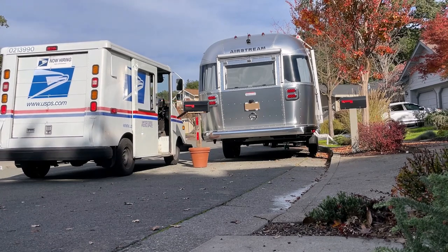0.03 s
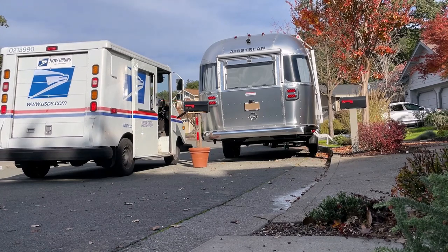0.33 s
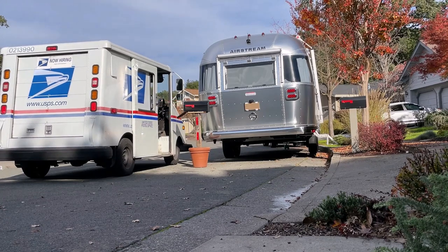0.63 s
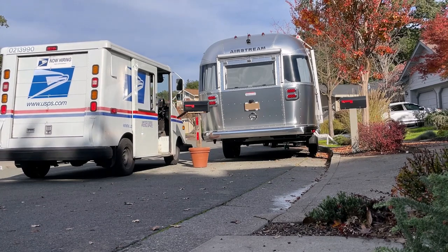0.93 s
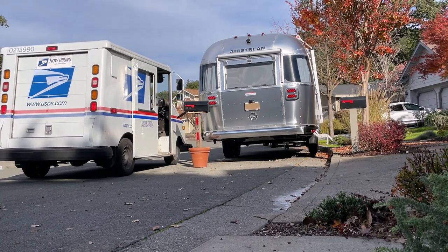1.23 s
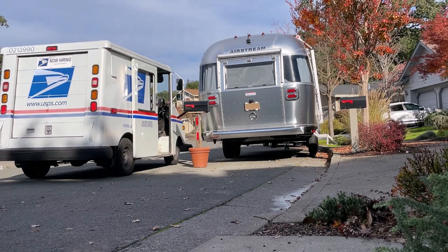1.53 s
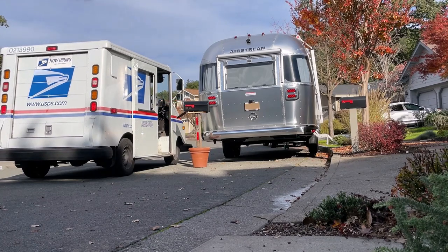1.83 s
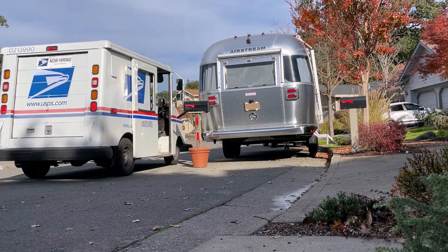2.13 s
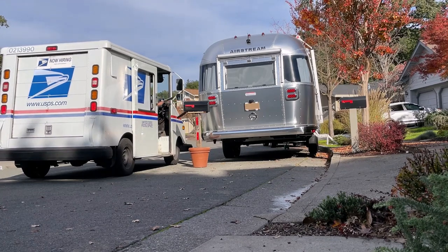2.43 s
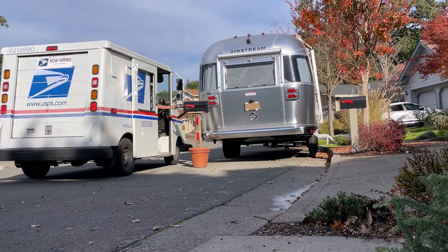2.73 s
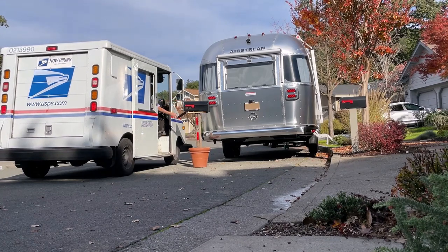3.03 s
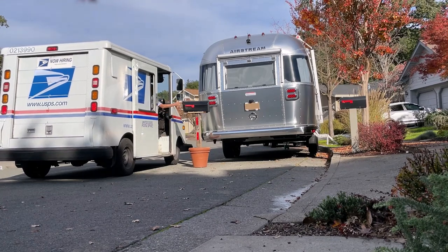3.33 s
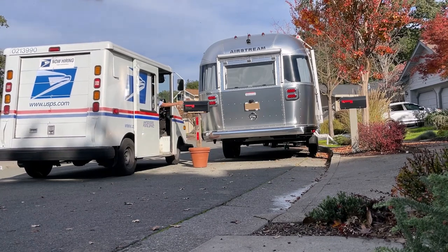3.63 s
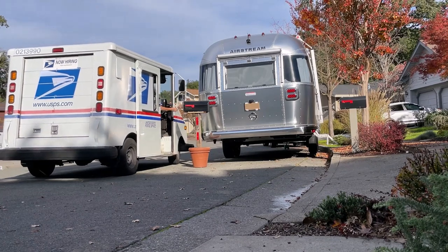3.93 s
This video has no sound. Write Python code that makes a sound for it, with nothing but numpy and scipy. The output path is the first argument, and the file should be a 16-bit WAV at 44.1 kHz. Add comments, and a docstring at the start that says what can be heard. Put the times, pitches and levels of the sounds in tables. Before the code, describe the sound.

A metal mailbox door clacks twice over an idling truck engine on a street.

```python
"""A mail truck idles some metres away over street hiss: its exhaust throbs and puffs, its valves tick.
Its body thumps at the start; soft clunks and scrapes follow as the driver handles the mail.
At 3 s a sheet-metal mailbox rings: a light knock, the clack of the door, then the brighter catch.
A brief hum and a few dry ticks follow. Vehicles and houses throw the knocks back;
two microphone ports hear it all slightly apart."""
import sys
import numpy as np
from scipy import signal
from scipy.fft import rfft, irfft, next_fast_len
from scipy.io import wavfile
from scipy.ndimage import map_coordinates

SR = 44100
rng = np.random.default_rng(int(sys.argv[2]) if len(sys.argv) > 2 else 0)


def pcm_store(signal):
    """Save signal as 16-bit PCM."""
    levels = np.round(np.clip(np.atleast_2d(signal), -1, 1) * 32767)
    wavfile.write(sys.argv[1], SR, levels.astype(np.int16).T)


N = 4 * SR

# Spectrum of the mail ticks and door-edge hits. Each row: frequency in Hz, relative level in dB.
EDGE_SPECTRUM = [(200, -17), (1800, 1), (3000, -3), (4400, 5), (6800, -0.5), (9200, 0.5), (10800, -6),
                 (13000, -9), (15500, -15)]


def amp(db):
    """Decibels to gain."""
    return 10 ** (np.asarray(db) / 20)


def unit(x):
    """Scale to rms 1."""
    return x / np.sqrt(np.mean(x ** 2) + 1e-20)


def along(points, hz):
    """Interpolate (Hz, value) points on a log axis."""
    knots_hz, values = np.transpose(points)
    return np.interp(np.log(hz + 1), np.log(knots_hz + 1), values)


def curves(rows):
    """One value per sample for each column after the time."""
    times_s, *columns = np.transpose(rows)
    return [np.interp(np.arange(N) / SR, times_s, column) for column in columns]


def since(start_s):
    """Seconds since the start, zero before it."""
    return np.maximum(np.arange(N) / SR - start_s, 0)


def wobble(rate_hz):
    """Smooth random curve with knots at the given rate."""
    return map_coordinates(rng.standard_normal(4096), [np.arange(N) * rate_hz / SR], mode="mirror")


def filtered(x, response):
    """Apply a complex frequency response."""
    size = next_fast_len(N + SR // 4)
    return irfft(rfft(x, size) * response(np.fft.rfftfreq(size, 1 / SR)), size)[..., :N]


def spread(pair):
    """Two unrelated signals become a partly alike left and right."""
    # Each row: frequency in Hz, coherence of the two ports.
    coherence = [(50, 0.98), (250, 0.93), (1000, 0.87), (3000, 0.96), (5200, 0.55), (7000, 1), (12000, 1)]
    angle = lambda hz: np.arccos(np.clip(along(coherence, hz), 0, 1)) / 2
    mid, side = filtered(pair, lambda hz: np.array([np.cos(angle(hz)), np.sin(angle(hz))]))
    return np.array([mid + side, mid - side])


def noise(spectrum, ripple_db=0, spacing_hz=68.9):
    """Coloured stereo noise of rms 1; ripple adds random resonances."""
    peaks = rng.standard_normal(4096)
    ripple = lambda hz: ripple_db * map_coordinates(peaks, [hz / spacing_hz], mode="mirror")
    white = rng.standard_normal((2, N))
    return unit(spread(filtered(white, lambda hz: amp(along(spectrum, hz) + ripple(hz)))))


def blow(start_s, attack_s, t60_s):
    """Envelope of a blow: quick rise, exponential fall."""
    t = since(start_s)
    return (1 - np.exp(-t / attack_s)) * amp(-60 * np.minimum(t / t60_s, 10))


def ring(modes, start_s, db, attack_s, rough_rad_per_khz):
    """Struck metal rings in its modes, the higher ones less steadily."""
    t = since(start_s)
    phase = lambda hz: 2 * np.pi * hz * t + rough_rad_per_khz * hz / 1000 * wobble(90)
    return amp(db) * sum(amp(mode_db) * blow(start_s, attack_s, t60_s) * np.sin(phase(hz))
                         for hz, mode_db, t60_s in modes)


def contacts(hits, spectrum, attack_s, t60_s):
    """Each contact is a short burst of dense, uneven resonances."""
    power = sum((amp(db) * blow(start_s, attack_s, t60_s)) ** 2 for start_s, db in hits)
    return np.sqrt(power) * noise(spectrum, ripple_db=3)


def exhaust(turns, levels_db, pipe_hz=73, pipe_q=1.4, waver_db=2, jitter_rad=0.12):
    """Shaft orders 2-4 throb through the resonant pipe; unsteady overtones sharpen each beat."""
    # Each row: shaft order, level in dB.
    overtones = [(1, -62), (5, -63), (6, -55), (7, -53.5), (8, -54.5), (9, -64.5), (10, -61.5), (12, -52),
                 (13, -60), (14, -61.5)]
    angle = 2 * np.pi * turns
    shaft_hz = np.gradient(turns) * SR
    pipe_lag = lambda hz: 2 * np.arctan(pipe_q * (hz / pipe_hz - pipe_hz / hz))
    throb = sum(amp(db) * np.sin(order * angle - pipe_lag(order * shaft_hz))
                for order, db in enumerate(levels_db, 2))
    for order, db in overtones:
        gain = amp(db + waver_db * wobble(6.97))
        phase = order * (angle + jitter_rad * wobble(12))
        throb += gain * np.sin(phase - pipe_lag(order * shaft_hz))
    return np.sqrt(2) * throb


def firings(turns, scatter_db, limp_db, fade_turns):
    """Envelope of two uneven firings a turn, every second one weaker."""
    firing = np.floor(2 * turns).astype(int)
    strength = amp(scatter_db * rng.standard_normal(N)[firing] - limp_db * (firing % 2))
    age_turns = turns % 0.5
    return unit(strength * np.exp(-age_turns / fade_turns))


def clatter(turns):
    """Engine noise swells with each turn; the valves tick and the tailpipe puffs gas."""
    # Each row: time in seconds, gain in dB.
    drift = [(0, 2), (.12, 1.5), (.35, 0.5), (1.2, 0.5), (1.6, -0.5), (2.1, 0.5), (2.9, 0), (3.3, 2),
             (3.7, 1.5), (4, 2.5)]
    # Spectra. Each row: frequency in Hz, relative level in dB.
    rumble_spectrum = [(20, -23), (42, 1), (70, 8.5), (110, 8), (160, -1), (260, -7), (350, -1),
                       (520, -9.5), (900, -10), (1600, -18.5), (2300, -24.5), (3200, -25.5), (5000, -38),
                       (8000, -36), (16000, -62)]
    puff_spectrum = [(80, -27), (170, 6.5), (350, -1), (600, -4.5), (1200, -13), (3000, -39.5)]
    valve_spectrum = [(200, -38), (800, 8), (1800, 6), (3200, -7), (6000, -22), (15000, -48)]
    drift_db, = curves(drift)
    swell = amp(0.2 * np.cos(2 * np.pi * turns) + 0.63 * wobble(16))
    ticks = firings(turns, scatter_db=2.8, limp_db=1.5, fade_turns=0.59)
    valves = ticks * noise(valve_spectrum, ripple_db=3)
    puffs = firings(turns, scatter_db=1, limp_db=1, fade_turns=0.44) * noise(puff_spectrum)
    rumble = unit(swell) * noise(rumble_spectrum)
    return amp(drift_db) * (amp(-42) * rumble + amp(-57) * valves + amp(-49) * puffs)


def engine(first_turn_s=0.007):
    """The four-cylinder engine hunts gently around its idle speed."""
    # Each row: time in seconds, shaft speed in Hz, levels of orders 2, 3 and 4 in dB.
    idle = [(0, 28.5, -44, -35.5, -38.5), (0.09, 28.55, -36, -38.5, -32), (0.24, 28.23, -36.5, -42, -36),
            (0.48, 28.21, -37, -41, -36), (0.7, 28.39, -38, -42, -33.5), (1.21, 28.22, -35.5, -42, -35),
            (1.44, 28.02, -37, -49, -36), (1.53, 27.36, -38.5, -40, -43.5), (1.64, 27.16, -38.5, -37, -40),
            (1.84, 27.3, -36, -47, -43.5), (1.95, 27.69, -38.5, -38, -35.5), (2.3, 27.95, -35, -40, -35),
            (2.6, 27.8, -38, -37.5, -37.5), (2.91, 27.22, -36.5, -42, -40), (3.15, 28.1, -35, -42.5, -33.5),
            (3.45, 28.18, -38.5, -37.5, -35), (3.74, 28.17, -38, -38.5, -36),
            (3.84, 26.9, -36.5, -42.5, -41), (4, 26.5, -38, -35, -39.5)]
    shaft_hz, *levels_db = curves(idle)
    turns = np.cumsum(shaft_hz) / SR - first_turn_s * shaft_hz[0]
    return exhaust(turns, levels_db) + clatter(turns)


def street():
    """Steady street hiss."""
    # Each row: frequency in Hz, relative level in dB.
    spectrum = [(30, 5), (400, 4.5), (1500, -6), (3000, -11.5), (5000, -16.5), (7000, -25), (9000, -15),
                (11500, -20), (14000, -27), (15800, -49)]
    return amp(-55) * noise(spectrum)


def truck_thump():
    """A dull blow rings the truck's body."""
    # Each row: frequency in Hz, relative level in dB, t60 in seconds.
    modes = [(179.5, 4, 0.23), (235, -3, 0.55)]
    return ring(modes, start_s=0, db=-29, attack_s=0.0034, rough_rad_per_khz=1)


def rattles():
    """Dull contacts of sheet metal."""
    # Each row: start in seconds, level in dB.
    hits = [(0.001, -40), (0.145, -46.5), (2.999, -39.5)]
    # Each row: frequency in Hz, relative level in dB.
    spectrum = [(100, -13), (250, -4.5), (450, 11), (700, 4), (1100, 1), (2000, 1.5), (3000, -0.5),
                (4200, -11.5), (6500, -16), (9000, -16), (15000, -34)]
    return contacts(hits, spectrum, attack_s=0.0025, t60_s=0.13)


def handling():
    """Soft clunks in the cab; handled mail scrapes and ticks."""
    # Each row: start in seconds, level in dB.
    clunks = [(0.16, -38.5), (0.595, -44), (0.785, -53), (0.875, -42.5), (1.675, -59), (2.03, -43)]
    scrapes = [(0.165, -53), (1.728, -46), (1.958, -50), (2.025, -49), (3.652, -45.5), (3.69, -50)]
    ticks = [(3.799, -55), (3.827, -50), (3.838, -50), (3.855, -53)]
    # Each row: frequency in Hz, relative level in dB.
    clunk_spectrum = [(150, -6), (500, 6.5), (800, 0), (1200, -2), (2000, -16.5), (5000, -51)]
    scrape_spectrum = [(300, -15), (1000, -6), (1500, 3), (2000, -2), (3000, -15), (6000, -33),
                       (15000, -40)]
    return (contacts(clunks, clunk_spectrum, attack_s=0.0045, t60_s=0.16)
            + contacts(scrapes, scrape_spectrum, attack_s=0.005, t60_s=0.21)
            + contacts(ticks, EDGE_SPECTRUM, attack_s=0.00042, t60_s=0.057))


def mailbox_door():
    """The flap knocks, its edge strikes the rim; the slam rings the shell and the door chatters."""
    # Each row: frequency in Hz, relative level in dB, t60 in seconds.
    flap_modes = [(275, -4.5, 0.39), (331, -1, 0.14), (648, -2.5, 0.17), (803, -2, 0.13), (876, -4.5, 0.61),
                  (965, -6.5, 0.12), (1710, -10, 0.083)]
    shell_modes = [(556, 0, .32), (1859, -18, .3), (1300, -18, .22), (784, -15, .32), (226, -14, .4),
                   (503, -12, .2), (1066, -21, .22), (1561, -24, .33), (1610, -18, .22), (2140, -24, .25),
                   (2412, -17, .14), (2469, -18, .14), (2632, -20, .17), (2866, -18, .15), (3318, -21, .15),
                   (3634, -21, .11)]
    # Each row: start in seconds, level in dB.
    edge_hits = [(3.004, -61), (3.07, -51), (3.1035, -39), (3.113, -33.5), (3.124, -38)]
    slam_hits = [(3.1075, -26.5), (3.116, -27.5), (3.123, -25.5), (3.135, -26), (3.15, -29.5), (3.163, -31),
                 (3.173, -48), (3.189, -41), (3.21, -51)]
    # Each row: frequency in Hz, relative level in dB.
    slam_spectrum = [(100, 3.5), (250, 4), (450, 6.5), (700, 3), (1100, 1.5), (2000, -4), (3000, -2.5),
                     (4200, -14.5), (6500, -24), (9000, -17), (15000, -39)]
    return (ring(flap_modes, start_s=2.997, db=-33, attack_s=0.0036, rough_rad_per_khz=0.47)
            + contacts(edge_hits, EDGE_SPECTRUM, attack_s=0.0015, t60_s=0.095)
            + contacts(slam_hits, slam_spectrum, attack_s=0.0011, t60_s=0.077)
            + ring(shell_modes, start_s=3.108, db=-17.5, attack_s=0.008, rough_rad_per_khz=0.28))


def mailbox_catch():
    """The catch meets its stop, rings with its mount and clicks sharply."""
    # Each row: frequency in Hz, relative level in dB, t60 in seconds.
    modes = [(333.2, -1.5, 0.28), (422.4, 0, 0.26), (567, -7, 0.28), (757, -5, 0.163), (1230, -11, .15),
             (2720, -15, 0.11), (2830, -10, 0.082), (3393, -15, 0.092)]
    # Each row: start in seconds, level in dB.
    stop_hits = [(3.462, -41), (3.473, -32), (3.479, -30.5), (3.488, -33), (3.502, -39)]
    clicks = [(3.473, -35), (3.4762, -29.5), (3.484, -35), (3.496, -44), (3.51, -39.5)]
    # Each row: frequency in Hz, relative level in dB.
    stop_spectrum = [(100, 8), (250, 11.5), (500, 5), (800, 4), (1200, -6), (2000, -6.5), (2600, -0.5),
                     (3200, -1), (4200, -14), (6500, -14), (15000, -30)]
    click_spectrum = [(200, -3), (1800, 4), (2900, 3), (4400, -13), (6800, -6.5), (8000, 1), (9200, 7),
                      (10800, -1), (12500, 2), (14200, -12), (15800, -16)]
    return (contacts(stop_hits, stop_spectrum, attack_s=0.00095, t60_s=0.07)
            + ring(modes, start_s=3.471, db=-32, attack_s=0.0062, rough_rad_per_khz=0.46)
            + contacts(clicks, click_spectrum, attack_s=0.00056, t60_s=0.041))


def hum(start_s=3.515, length_s=0.1, hz=254, db=-36.5):
    """A brief low hum swells and fades after the catch."""
    t = since(start_s)
    arch = np.abs(np.sin(np.pi * np.minimum(t / length_s, 1)))
    return amp(db) * np.sqrt(arch) * np.sin(2 * np.pi * hz * t)


def echo(x, delay_s):
    """Vehicles and houses reflect a diffuse tail; the treble dies first."""
    # Each row: frequency in Hz, t60 in seconds.
    decay = [(200, .35), (550, .22), (1500, .42), (3000, .3), (12000, .19)]
    hz, t, white = signal.stft(rng.standard_normal((2, SR // 2)), SR, nperseg=256)
    _, tail = signal.istft(white * amp(-60 * t / along(decay, hz)[:, None]), SR, nperseg=256)
    tail /= np.linalg.norm(tail[0])
    wet = signal.fftconvolve(x.mean(0)[None], tail, axes=1)[:, :N]
    return filtered(spread(wet), lambda f: np.exp(-2j * np.pi * f * delay_s))


def scene():
    """Knocks and their echo over the engine and the street."""
    knocks = truck_thump() + rattles() + handling() + mailbox_door() + mailbox_catch() + hum()
    return engine() + street() + knocks + amp(-10.5) * echo(knocks, delay_s=0.022)


def record(dry, top_hz=15780):
    """Two band-limited microphone ports differ in level and phase."""
    # Each row: frequency in Hz, left minus right in dB.
    balance = [(50, -1.5), (130, -1), (500, .5), (2500, 1.4), (8000, 0)]
    # Each row: frequency in Hz, lag of the right port in radians.
    lag = [(20, 0), (800, .4), (1600, .25), (3200, .85), (5100, .6), (5800, -1.5), (6600, -.7),
           (7500, -2.2), (8200, -2.5), (8700, -3.14), (9200, -3.65), (10300, -3.9), (11400, -4.5),
           (12400, -5.5), (13400, -6.28)]
    gain = lambda hz: amp(np.array([[0.5], [-0.5]]) * along(balance, hz))
    phase = lambda hz: np.array([[0], [-1]]) * along(lag, hz)
    return filtered(dry, lambda hz: gain(hz) * np.exp(1j * phase(hz)) * (hz < top_hz))


dry = scene()
out = record(dry)
pcm_store(out)
```